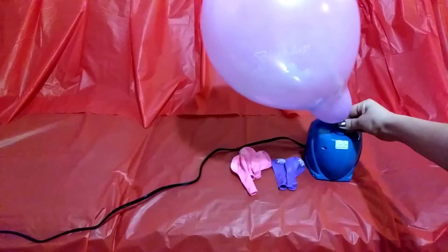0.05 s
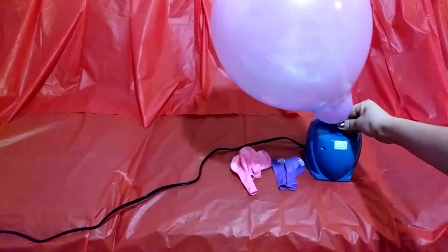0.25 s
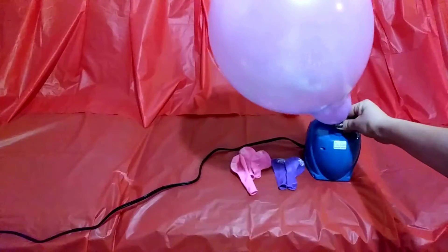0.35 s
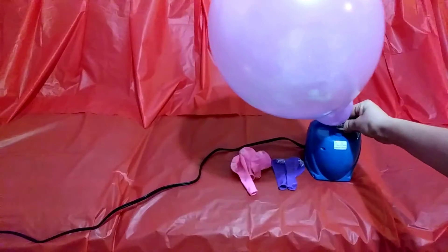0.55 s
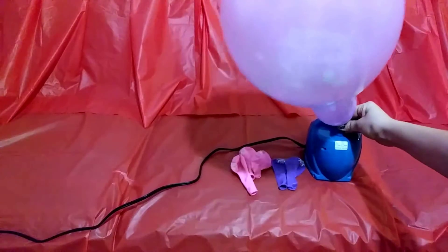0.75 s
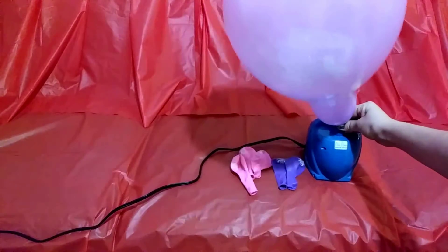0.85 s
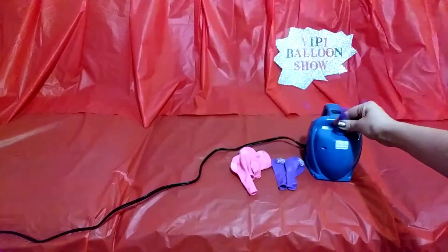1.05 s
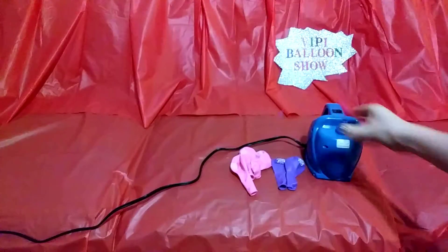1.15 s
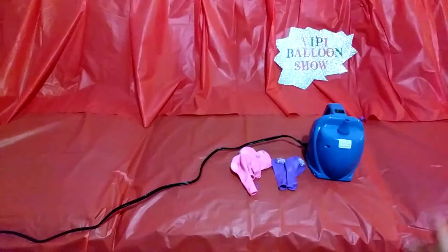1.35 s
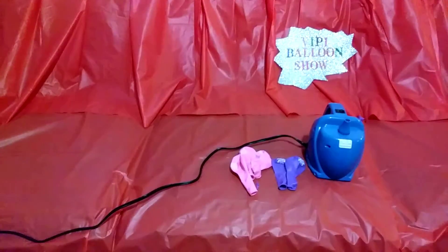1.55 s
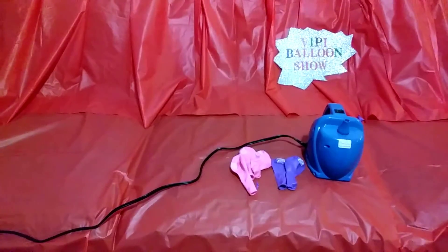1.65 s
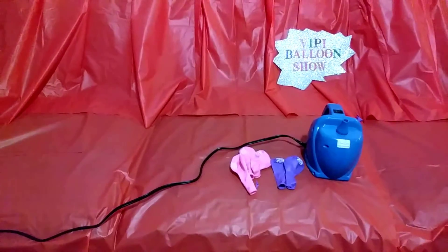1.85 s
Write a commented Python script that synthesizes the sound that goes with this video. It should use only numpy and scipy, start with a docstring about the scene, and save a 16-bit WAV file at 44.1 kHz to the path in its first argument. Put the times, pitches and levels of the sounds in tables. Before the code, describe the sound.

An electric pump fills a balloon with rushing air and a briefly rising whine. The balloon bursts with a loud bang that overloads the microphone and rings in the small room, then the pump winds down.

```python
"""An electric pump fills a balloon in a small room. At first its motor coasts, the fan rushes and
air churns in the balloon. A short burst of power brings a rising whine that pulses with the mains,
then the motor coasts down again. The balloon bursts: the bang jams the microphone for a moment and
the room rings into the limiter. Last, the fan runs down with its nozzle open."""
import sys
import numpy as np
from scipy import signal
from scipy.fft import rfft, irfft
from scipy.io import wavfile
from scipy.ndimage import uniform_filter1d, minimum_filter1d

SR = 44100
rng = np.random.default_rng(int(sys.argv[2]) if len(sys.argv) > 2 else 0)


def log_audio(samples):
    """Write samples as a 16-bit WAV file to the path given in sys.argv[1]."""
    # one column per channel
    frames = np.atleast_2d(samples).T
    # limit to full scale, then quantise
    limited = np.clip(frames, -1, 1)
    pcm = np.round(limited * 32767).astype(np.int16)
    wavfile.write(sys.argv[1], SR, pcm)


N = 83790
T = np.arange(N) / SR
HZ = np.fft.rfftfreq(N, 1 / SR)
POWER_ON_S, POWER_OFF_S = .1945, .545
TEAR_S, BANG_S, JAM_S, FREE_S = .924, .9311, .9325, .976
MAINS_PULSE_HZ = 120
BLADES, SEGMENTS = 7, 12  # of the fan, and of the commutator (the motor's spinning contact)


def amp(db):
    """Turns decibels into a gain."""
    return 10 ** (np.asarray(db) / 20)


def unit(x):
    """Scales a signal to an average (rms) size of 1."""
    return x / np.sqrt(np.mean(x ** 2) + 1e-20)


def curve(points):
    """Joins (time, value) points with straight lines."""
    return np.interp(T, *np.transpose(points))


def at_pitch(points, hz, column=1):
    """Looks up one column of a table at the given pitches."""
    table = np.transpose(points)
    return np.interp(np.log(hz + 1), np.log(table[0]), table[column])


def shaped_noise(gains):
    """Noise of size 1, with its own weight for each pitch."""
    return unit(irfft(rfft(rng.standard_normal(N)) * gains, N))


def noise(points):
    """Noise with the tone colour given in a table."""
    return shaped_noise(amp(at_pitch(points, HZ)))


def drift(rate_hz):
    """A random wobble; a higher rate makes it quicker."""
    return shaped_noise(np.exp(-(HZ / rate_hz) ** 2))


# Tone colour of the background: pitch_hz, relative_db
BACKGROUND_COLOUR = [(25, -14), (55, 18), (100, 8), (200, -22), (1000, -4), (8000, -15), (16000, -4)]

def background():
    """A faint, steady rumble and hiss."""
    return amp(-50) * noise(BACKGROUND_COLOUR)


# Hollow spaces in the pump's housing: pitch_hz, width_hz, relative_db
HOLLOWS = [(910.4, 8.5, -44), (1311, 10, -52), (2065, 106, -50), (2510, 70, -49.5), (3052, 53, -43)]

def housing_hollows(log_speed):
    """Air rings the hollows at steady pitches, louder when the fan is faster."""
    rings = sum(amp(db) * shaped_noise(1 / (1 + (2 * (HZ - hz) / width) ** 2))
                for hz, width, db in HOLLOWS)
    return rings * amp(23 * log_speed)


# Tone colour of the air in the balloon: pitch_hz, relative_db
CHURN_COLOUR = [(30, -40), (70, -9.5), (110, -26), (180, -6.5), (330, -1), (620, 1), (950, -6),
                (1500, -14.5), (3000, -54), (16000, -70)]
# How loudly it churns: time_s, level_db
CHURN_LEVEL = [(0, -31.5), (.1, -31), (.22, -32.5), (.3, -36.5), (.6, -33), (.92, -32)]

def balloon_churn():
    """Air churns in the balloon until it bursts."""
    level_db = curve(CHURN_LEVEL) + 1.5 * drift(rate_hz=55)
    return amp(level_db) * noise(CHURN_COLOUR) * (T < BANG_S)


# Tone colour of the fan with the balloon on: pitch_hz, relative_db
RUSH_WITH_BALLOON = [(60, -19), (250, -13), (500, -37), (1100, -6), (1800, -13), (2700, -9.5), (4000, -6.5),
                     (5000, -5), (5800, 2), (6800, -4.5), (8000, -14), (10000, -28.5), (12000, -33.5),
                     (16000, -30)]
# The same with the nozzle open: pitch_hz, relative_db
RUSH_OPEN = [(40, -24), (90, -11.5), (190, -13), (380, -5), (1000, -11), (1350, -8), (1750, -18.5),
             (2700, -14.5), (4200, -7), (4800, -9), (5750, -2), (7100, -4.5), (7800, -12.5), (9800, -13.5),
             (10400, -24.5), (12000, -28), (16000, -26)]

def fan_rush(log_speed, power, pulse):
    """The rush of air follows the fan's speed and throbs while the power is on."""
    throb = 1 + .33 * power * (2 * pulse - 1)
    filling = amp(-27.5 + 72 * log_speed) * noise(RUSH_WITH_BALLOON) * throb
    open_nozzle = amp(-25 + 38 * log_speed) * noise(RUSH_OPEN)
    return np.where(T < BANG_S, filling, open_nozzle)


# How fast the motor's shaft spins: time_s, turns_per_s
SHAFT_SPEED = [(0, 344.5), (.195, 321.5), (.216, 339), (.25, 371), (.294, 415), (.325, 435), (.356, 453),
               (.394, 470), (.476, 497), (.54, 519), (.7, 476), (.82, 445), (.92, 425), (1.2, 383),
               (1.37, 349), (1.5, 324.5), (1.7, 290), (1.9, 260)]

def spinning_shaft():
    """The shaft coasts, speeds up and runs down, turning a little unevenly."""
    speed = curve(SHAFT_SPEED)
    uneven_speed = speed * (1 + .0008 * drift(rate_hz=54))
    return speed, 2 * np.pi * np.cumsum(uneven_speed) / SR


# Shaft tones that stand out, each fading away from its best speed:
# multiple, with_balloon_db, nozzle_open_db, best_turns_per_s, fade_db_per_octave
STRONG_TONES = [(1, -39.5, -42.5, 390, 7.5), (2, -42, -53.5, 960, 3.5), (3, -47, -53, 440, 11),
                (13, -42.5, -44.5, 520, 1.5), (18, -41, -38.5, 330, 17), (20, -30, -33.5, 290, 81),
                (21, -47.5, -46, 295, 15)]
# How the housing colours the weaker tones: pitch_hz, relative_db
HOUSING_COLOUR = [(300, -47), (1300, -58), (2200, -53), (4000, -47.5), (5700, -35), (7000, -49),
                  (8500, -57.5), (10500, -58.5), (12500, -97), (16000, -66)]
# The commutator's smooth tone: time_s, level_db
COMMUTATOR_TONE = [(0, -37), (.19, -40), (.64, -37), (.69, -27), (.74, -26), (.79, -31), (.85, -28),
                   (.92, -34), (1.2, -42), (1.28, -36), (1.42, -37), (1.52, -47), (1.9, -51)]
# The tone an octave above it: time_s, level_db
COMMUTATOR_OCTAVE = [(0, -51), (.33, -54), (.4, -68), (.7, -68), (.79, -54), (.92, -53), (1.55, -57),
                     (1.72, -40), (1.9, -43)]
# The tone of the fan blades: time_s, level_db
BLADE_TONE = [(0, -50), (.28, -52), (.315, -33), (.44, -39), (.56, -30), (.65, -39), (.77, -41), (.84, -35),
              (.92, -37), (1.25, -47), (1.8, -50), (1.9, -58)]

def shaft_tones(speed, angle, log_speed):
    """Each multiple of the shaft's speed sings faintly, and a few stand out."""
    strong_db = {}
    for multiple, balloon_db, open_db, best_speed, fade in STRONG_TONES:
        octaves_away = abs(np.log2(speed / best_speed))
        strong_db[round(multiple)] = np.where(T < BANG_S, balloon_db, open_db) - fade * octaves_away
    strong_db[SEGMENTS] = curve(COMMUTATOR_TONE)
    strong_db[2 * SEGMENTS] = curve(COMMUTATOR_OCTAVE)
    strong_db[BLADES] = curve(BLADE_TONE)
    tones = np.zeros(N)
    for multiple in range(1, 46):
        pitch_hz = multiple * speed
        weak_db = at_pitch(HOUSING_COLOUR, pitch_hz) + 31 * log_speed
        tone = np.sin(multiple * angle + 2 * np.pi * rng.random()) * (pitch_hz < SR / 2)
        shimmer_db = 2 * drift(rate_hz=22)
        tones += np.sqrt(2) * amp(strong_db.get(multiple, weak_db) + shimmer_db) * tone
    return tones


# The commutator's whine under power: time_s, level_db
WHINE_LEVEL = [(.195, -21.5), (.216, -15), (.235, -20.5), (.25, -30), (.285, -24), (.32, -15.5), (.35, -10),
               (.39, -5), (.425, -20.5), (.465, -19), (.5, -33), (.545, -32)]

def powered_motor(angle, power, pulse):
    """Under power the commutator whines with each mains pulse, the brushes fizz and the iron hums."""
    octave_fade = np.exp(-np.maximum(T - POWER_ON_S, 0) / .04)
    tone = np.sin(SEGMENTS * angle) + amp(-14) * np.sin(2 * SEGMENTS * angle) * octave_fade
    whine_db = curve(WHINE_LEVEL) + 1.5 * drift(rate_hz=36)
    whine = amp(whine_db) * unit(pulse ** 1.34) * np.sqrt(2) * tone
    treble_filter = signal.butter(1, 7000, "high", fs=SR)
    fizz = unit(signal.lfilter(*treble_filter, rng.standard_normal(N)))
    hum = np.sqrt(2) * np.sin(2 * np.pi * MAINS_PULSE_HZ * T)
    return power * (whine + amp(-43) * pulse * fizz + amp(-47) * hum)


def room(x, ring_s=.32, echo_db=-4.5):
    """The walls add a short tail of scattered echoes."""
    t = T[:SR // 2]
    echoes = rng.standard_normal(len(t)) * (rng.random(len(t)) < .05) * (t > .004)
    tail = echoes * np.exp(-np.log(1000) * t / ring_s)
    return x + amp(echo_db) * signal.fftconvolve(x, tail / np.linalg.norm(tail))[:N]


# The bang in the room: pitch_hz, relative_db, ring_s (time to fade by 60 dB)
BANG_RING = [(40, -18, 0.55), (121, -11.5, 0.35), (307, -2, 0.44), (677, 2.5, 0.33), (1020, -2, 0.4),
             (1930, -14, 0.4), (3050, -11, 0.45), (4310, -1, 0.38), (5350, 3.5, 0.43), (6130, 4, 0.32),
             (8240, -13.5, 0.38), (10900, -19.5, 0.23), (16000, -39, 0.49)]

def balloon_burst(crack_fade_s=.004):
    """Pressure swells as the skin tears, the rubber cracks, and the bang dies away in the room."""
    hz, t, bands = signal.stft(noise(BANG_RING), SR, nperseg=512)
    ring_s = at_pitch(BANG_RING, hz, column=2)[:, None]
    fade = np.exp(-np.log(1000) * np.maximum(t - BANG_S, 0) / ring_s)
    bang = signal.istft(bands * fade, SR, nperseg=512)[1][:N]
    swell = ((T - TEAR_S) / (BANG_S - TEAR_S)).clip(0, 1) ** 2.8
    crack = rng.standard_normal(N) * np.exp(-np.maximum(T - BANG_S, 0) / crack_fade_s)
    return np.where(T < BANG_S, amp(2.5) * swell, amp(28) * crack + amp(19.5) * bang)


def scene():
    """The pump and the balloon, straight ahead."""
    speed, angle = spinning_shaft()
    log_speed = np.log10(speed / 400)  # 0 at 400 turns a second, below 0 when slower
    power = uniform_filter1d(1. * ((T > POWER_ON_S) & (T < POWER_OFF_S)), size=200)
    pulse = np.sin(np.pi * MAINS_PULSE_HZ * (T - POWER_ON_S)) ** 2  # one per mains half wave
    motor = shaft_tones(speed, angle, log_speed) + powered_motor(angle, power, pulse)
    pump = room(motor)
    air = fan_rush(log_speed, power, pulse) + balloon_churn()
    flutter = amp(.47 * drift(rate_hz=150))
    mono = pump + air * flutter + housing_hollows(log_speed) + balloon_burst() + background()
    return np.array([mono, mono])


def microphone_jam(x, limit=2.9, stuck_at=-1.45, bass_hz=90, bass_q=1.2):
    """The bang pins the microphone at one value; it comes free lopsided, and its bass filter rings."""
    offset = 3.2 * np.exp(-np.maximum(T - FREE_S, 0) / .015) * (T >= FREE_S)
    clipped = np.clip(x + offset, -limit, limit)
    jammed = np.where((T > JAM_S) & (T < FREE_S), stuck_at, clipped)
    corner = 2 * np.pi * bass_hz
    bass_cut = signal.bilinear([1, 0, 0], [1, corner / bass_q, corner ** 2], SR)
    return signal.lfilter(*bass_cut, jammed)


def limiter(x, ceiling_db=-.5, recovery_db_per_s=900):
    """Turns loud peaks down at once, then quickly lets the level back up."""
    recovery_db = T * recovery_db_per_s
    over_db = np.maximum(20 * np.log10(abs(x).max(0) + 1e-9) - ceiling_db, 0)
    held_db = np.maximum.accumulate(over_db + recovery_db) - recovery_db
    widened_db = -minimum_filter1d(-held_db, size=15)
    return x / amp(uniform_filter1d(widened_db, size=15))


def record(dry):
    """The microphone jams, the limiter tames the peaks, and the highest treble is cut."""
    limited = limiter(microphone_jam(dry))
    treble_cut = signal.firwin(255, 16000, window=("kaiser", 8), fs=SR)
    return signal.oaconvolve(limited, treble_cut[None], "same")


dry = scene()
out = record(dry)
log_audio(out)
```